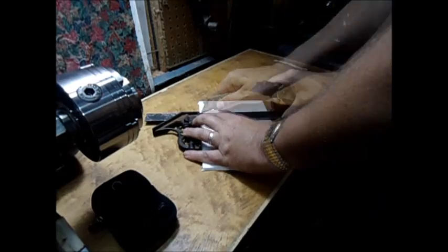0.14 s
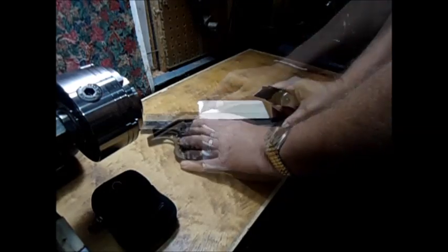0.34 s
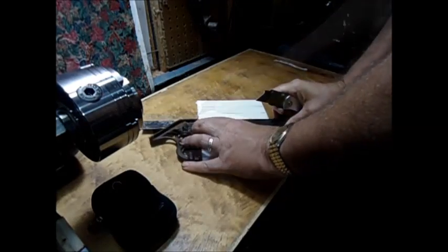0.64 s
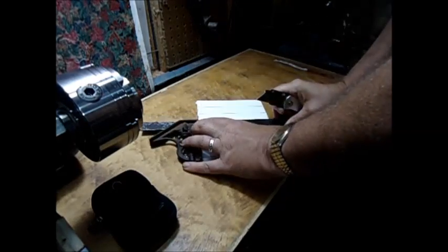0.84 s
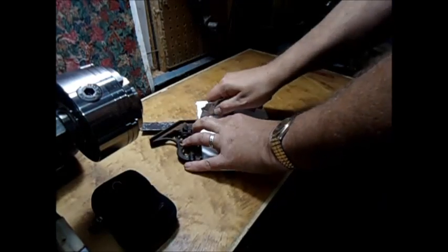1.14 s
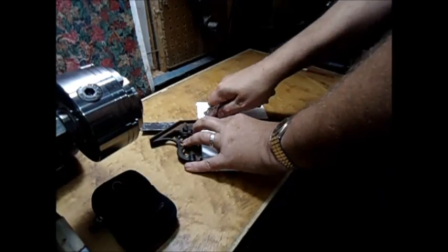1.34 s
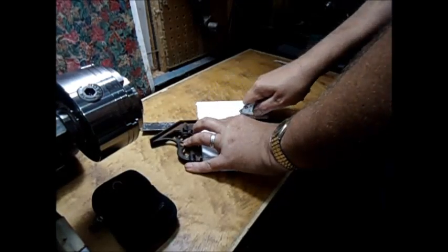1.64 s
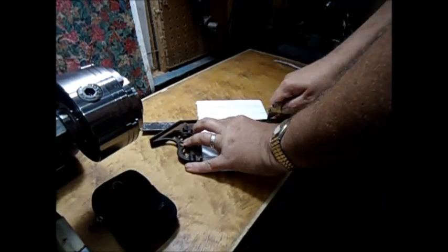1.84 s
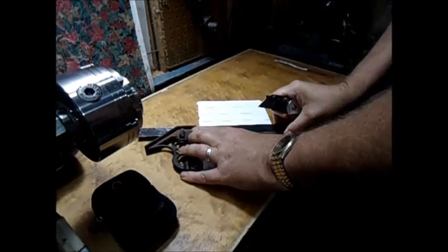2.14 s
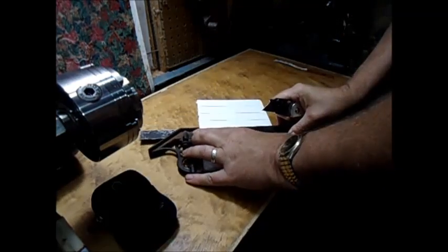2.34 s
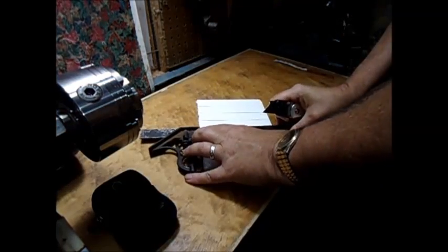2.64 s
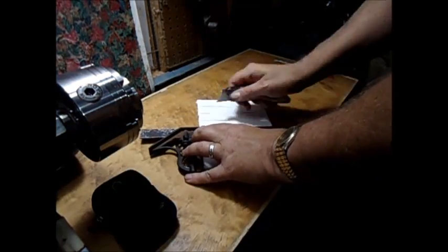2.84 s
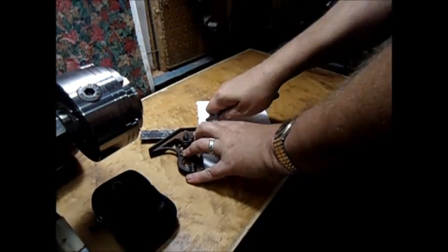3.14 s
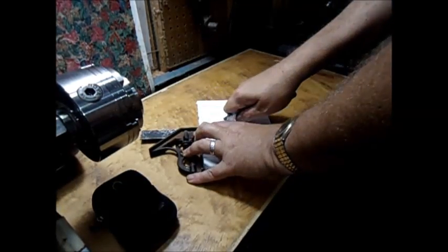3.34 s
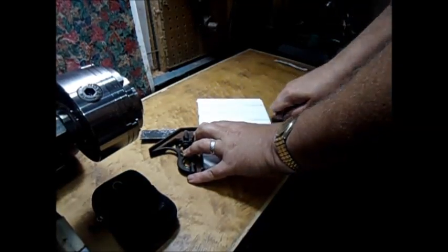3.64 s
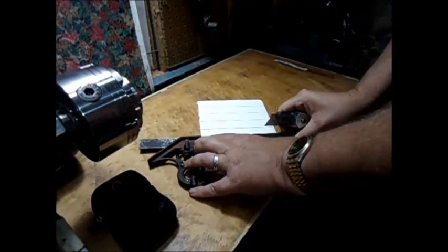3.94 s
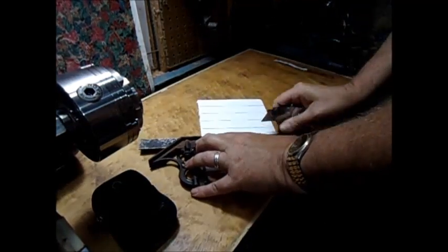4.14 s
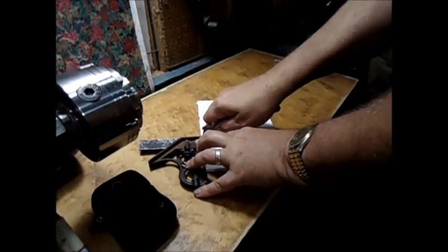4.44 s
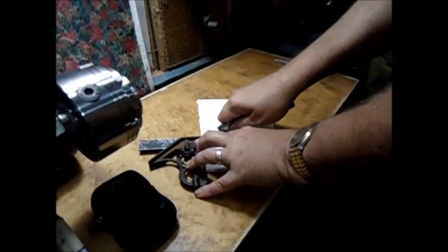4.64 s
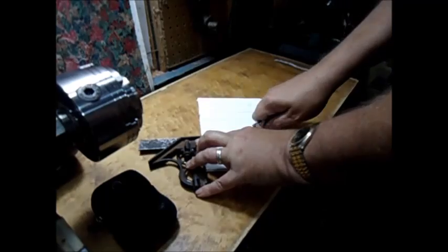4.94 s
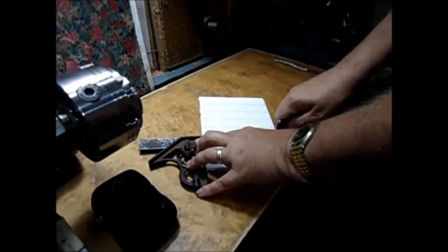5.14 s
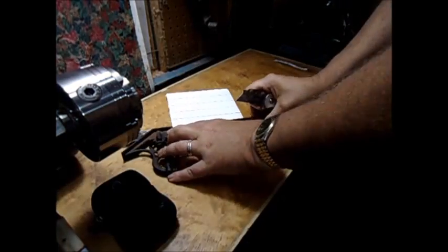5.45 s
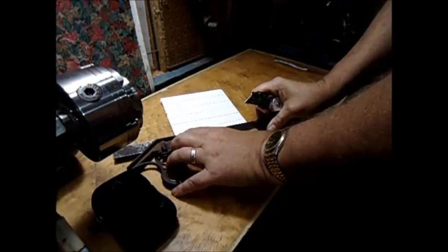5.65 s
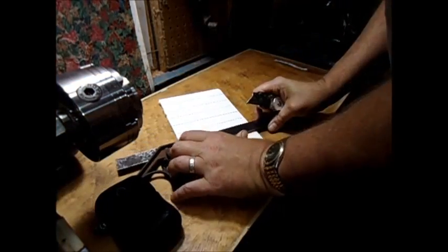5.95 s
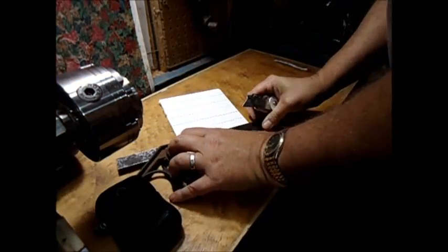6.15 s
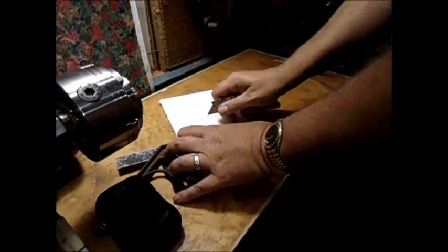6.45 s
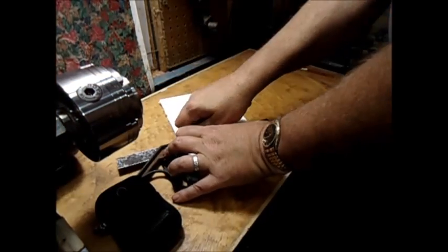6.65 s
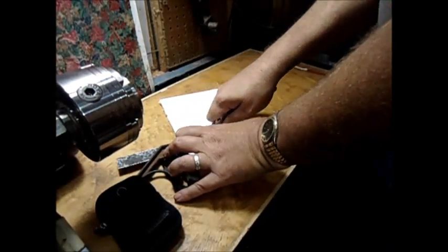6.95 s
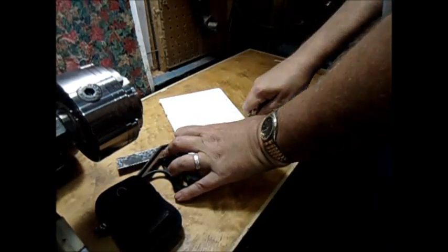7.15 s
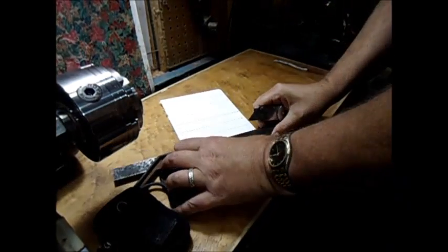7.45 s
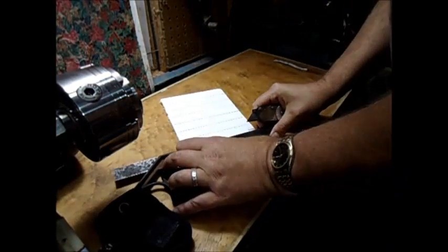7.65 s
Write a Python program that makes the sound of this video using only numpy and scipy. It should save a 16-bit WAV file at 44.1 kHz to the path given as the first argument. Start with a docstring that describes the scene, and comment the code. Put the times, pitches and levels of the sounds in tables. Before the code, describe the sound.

A small cutter scores foam board along a metal straightedge. Each half-second stroke is a thin, uneven, papery rasp with a faint metallic edge, growing towards its end; loud wooden-metallic snaps follow. Pauses hold soft rubbing, brief paper scuffs, small ticks and muffled bench knocks, the strongest shifting after the third cut. Dry close pickup in a small quiet room, mono, with low hum and a little hiss.

```python
"""Cutting foam board along a steel square

In four strokes a hand cutter tears the paper face of foam board: random grains in surges, and blade modes.
Its holder drags along the square, and board and square slide: grains filtered into dull and bright bands.
Snaps onto the wooden bench, one early and others as strokes end, and knocks are clicks or noise ringing
damped modes; ticks are dying noise. Below lies room hum with rumble; the level dips once for a moment."""
import sys
import numpy as np
from scipy import signal
from scipy.fft import rfft, irfft, next_fast_len
from scipy.io import wavfile

SR = 44100
rng = np.random.default_rng(int(sys.argv[2]) if len(sys.argv) > 2 else 0)


def generate_wav(sig):
    """Save sig (samples, or channels by samples) to the path in sys.argv[1] as 16-bit PCM at SR."""
    pcm = np.round(np.clip(np.atleast_2d(sig).T, -1, 1) * 32767).astype(np.int16)
    wavfile.write(sys.argv[1], SR, pcm)


N = 344200

# four pulls of the blade, each a curve: (t/s, tearing level/dB, holder drag level/dB)
STROKES = [
    [(1.48, -70, -79), (1.52, -54, -74), (1.55, -60, -76), (1.595, -49.5, -58), (1.64, -59, -71),
     (1.68, -56, -69), (1.74, -59, -65), (1.77, -68, -77), (1.797, -48, -54), (1.81, -58, -63),
     (1.822, -52, -60), (1.845, -61, -71), (1.873, -47, -54.5), (1.92, -63, -66), (1.942, -54, -63)],
    [(3.13, -67, -68), (3.2, -56, -57.5), (3.26, -57.5, -57.5), (3.3, -62, -69), (3.375, -51.5, -60.5),
     (3.45, -61, -59.5), (3.49, -55, -58), (3.51, -55, -64), (3.53, -48, -50), (3.55, -54, -65),
     (3.575, -43, -53.5), (3.588, -50, -58), (3.605, -46, -55), (3.645, -74, -81), (3.7, -46, -56),
     (3.722, -66, -71), (3.745, -50, -55), (3.759, -39, -45)],
    [(4.585, -68, -68), (4.62, -56.5, -58.5), (4.69, -65, -57.5), (4.74, -48.5, -55), (4.775, -66, -62),
     (4.84, -51.5, -62), (4.9, -58, -57.5), (4.97, -61, -65), (5.03, -52, -60), (5.075, -54, -58),
     (5.1, -67, -74), (5.2, -56, -56.5), (5.265, -55, -61.5)],
    [(6.8, -69, -68), (6.82, -55.5, -68), (6.92, -68, -71), (6.957, -48, -61), (6.98, -62, -65.5),
     (7.05, -53, -53), (7.11, -56, -59.5), (7.15, -54, -60), (7.17, -55, -60), (7.192, -51, -52),
     (7.215, -70, -76)],
]
# spectrum of a dull rub: (f/Hz, relative level per Hz/dB)
RUB_COLOUR = [(350, -47), (600, -8), (977, -0.5), (1160, -4.5), (3940, -6), (5470, -11.5), (9000, -21.5),
              (11700, -57), (19800, -120)]


def from_db(db):
    """Amplitude ratio: 20 dB is a factor of ten."""
    return 10 ** (np.asarray(db, float) / 20)


def rms_one(x):
    """Normalisation of mean power: scale to rms 1."""
    return x / np.sqrt(np.mean(x ** 2) + 1e-20)


def in_time(rows):
    """Linear interpolation: the columns of a curve, sample by sample."""
    s, *columns = np.transpose(rows)
    return [np.interp(np.arange(N) / SR, s, c) for c in columns]


def coloured(x, spectrum):
    """Linear filtering: weight the spectrum by levels in dB on a log-frequency axis; rms 1."""
    size = next_fast_len(N)
    hz = np.maximum(np.arange(size // 2 + 1) * SR / size, 1)
    table = np.array(spectrum)
    gain = from_db(np.interp(np.log(hz), np.log(table[:, 0]), table[:, 1]))
    return rms_one(irfft(rfft(x, size) * gain, size)[:N])


def drift(rate_hz):
    """Low-passed noise: a slow random course of rms 1, drawn at every 20th sample."""
    r = np.exp(-2 * np.pi * rate_hz * 20 / SR)
    noise = rng.standard_normal(N // 20 + 2002)
    slow = signal.lfilter([1], [1, -2 * r, r * r], noise)[2000:]     # leave out the filter's onset
    return np.interp(np.arange(N) / 20, np.arange(len(slow)), rms_one(slow))


def ring(drive, hz, t60):
    """Damped resonance: a unit click sets a sine of height 1 ringing, 60 dB down after t60 seconds."""
    r, w = from_db(-60 / (t60 * SR)), 2 * np.pi * hz / SR
    return signal.lfilter([0, np.sin(w)], [1, -2 * r * np.cos(w), r * r], drive + 1e-18)


def high_pass(x, hz):
    """Second-order high-pass: attenuation of 12 dB per octave well below the corner."""
    return signal.sosfilt(signal.butter(2, hz, "high", fs=SR, output="sos"), x)


def add(out, s, peak_db, sound):
    """Superposition: place a short sound at a time with a given peak."""
    at = round(s * SR)
    out[at:at + len(sound)] += (from_db(peak_db) * sound / np.max(np.abs(sound)))[:N - at]


def grains(per_s, spread_db, surge_db, surge_hz):
    """Stick and slip: contacts break one by one at random sizes and come in surges."""
    sizes = from_db(spread_db * np.minimum(rng.exponential(1, N), 4)) * rng.choice([-1, 1], N)
    breaks = rng.random(N) < per_s / SR
    return sizes * breaks * from_db(surge_db * drift(surge_hz))


def stroke_gain(rows, column):
    """Level envelope: gain of one stroke's curve, silent before and after."""
    t, table = np.arange(N) / SR, np.array(rows)
    return from_db(np.interp(t, table[:, 0], table[:, column], left=-200, right=-200))


def one_band(grit, hz):
    """Resonant friction: grit passes twice through one damped resonance."""
    t60 = 32 / hz     # the same number of cycles in any band
    return rms_one(ring(ring(grit, hz, t60), hz, t60))


def tearing():
    """Fracture noise: parting paper fibres give bright grit; the blade's modes ring, each swelling alone."""
    # blade modes ringing under the tearing: (f/Hz, mean level/dB, t60/s)
    blade_modes = [(8550, -16.5, 0.0023), (9700, -12.5, 0.0039), (11400, -18, 0.0061), (12100, -26, 0.0062),
                   (13000, -16, 0.0056), (14600, -11, .004)]
    # spectrum of parting fibres: (f/Hz, relative level per Hz/dB)
    tear_colour = [(1760, -45), (3000, -37), (4450, -9), (5260, -4), (6790, -14), (8300, -2), (12200, 4.5),
                   (15700, -4)]
    fibres = grains(per_s=9000, spread_db=2.5, surge_db=3.8, surge_hz=80)
    chatter = grains(per_s=5500, spread_db=3, surge_db=4.0, surge_hz=40)
    swell_db = 4.5
    blade = sum(from_db(db + swell_db * drift(16)) * rms_one(ring(chatter, hz, t60))
                for hz, db, t60 in blade_modes)
    effort = sum(stroke_gain(rows, column=1) for rows in STROKES)
    return effort * rms_one(coloured(fibres, tear_colour) + blade)


def dragging():
    """Sliding friction: the blade holder rubs along the square, dull grit with a few rasping bands."""
    # bands rung along the square, one list a stroke: (f/Hz, level re dull grit/dB)
    rasp_bands = [
        [(5270, -2.5), (2320, -6)],
        [(5260, -4), (2830, -11)],
        [(5050, -7), (1960, -6.5)],
        [(3480, -2), (2690, -3.5), (4600, -7)],
    ]
    grit = grains(per_s=6000, spread_db=2.8, surge_db=2.0, surge_hz=50)
    dull = coloured(grit, RUB_COLOUR)
    out = np.zeros(N)
    for rows, bands in zip(STROKES, rasp_bands):
        rasp = sum(from_db(db) * one_band(grit, hz) for hz, db in bands)
        out += stroke_gain(rows, column=2) * (dull + rasp)
    return out


def sliding():
    """Sliding friction: each slide swells and fades as even grit, dull, bright and in one band."""
    # board, square and blade slid between cuts: (start t/s, loudest t/s, end t/s,
    # dull rub level/dB, bright paper scuff level/dB, rung band f/Hz, rung band level/dB)
    slides = [(.08, 0.095, .11, -57, -60, 4800, -75), (0.09, .18, 0.25, -57.5, -71, 4800, -73),
              (0.244, .265, .3, -59.5, -57.5, 4800, -72), (0.266, 0.336, 0.58, -55.5, -82, 3210, -60.5),
              (0.347, 0.396, .47, -70, -69, 7800, -65), (0.497, 0.677, 1.07, -63.5, -86, 4800, -71),
              (1.276, 1.288, 1.32, -66, -56, 10000, -60), (1.378, 1.418, 1.435, -65, -56, 10100, -56),
              (1.966, 2.082, 2.4, -63, -70, 2700, -75), (2.235, 2.247, 2.27, -54, -57, 4500, -64),
              (2.27, 2.275, 2.31, -59.5, -56, 5000, -60), (2.427, 2.486, 2.53, -68, -69, 5600, -67),
              (3.072, 3.095, 3.12, -62, -52, 5000, -67), (3.935, 3.962, 4.04, -46, -59, 4160, -52),
              (3.988, 4.047, 4.1, -55.5, -67, 4430, -59), (4.186, 4.272, 4.36, -58, -80, 4830, -74),
              (5.353, 5.47, 5.55, -51, -45, 3480, -53.5), (5.537, 5.592, 5.6, -51, -62, 4440, -61),
              (5.65, 5.662, 5.74, -57, -57, 3660, -61), (5.698, 5.69, 5.78, -60.5, -62, 3660, -68),
              (5.943, 6.003, 6.13, -60, -63.5, 3100, -60.5), (7.264, 7.289, 7.29, -48.5, -52, 4000, -63),
              (7.433, 7.454, 7.5, -55, -65, 3840, -71), (7.48, 7.525, 7.59, -49, -57, 3900, -53)]
    # spectrum of a bright paper scuff: (f/Hz, relative level per Hz/dB)
    scuff_colour = [(1500, -27), (3000, -13), (5500, -3.5), (6600, -7.5), (9000, 0.5), (10000, 0),
                    (13000, 2.5), (15700, -1.5)]
    fade_db, roundness = -18.5, 1.59     # level at both ends re loudest; 1 peaked, 2 rounded
    out = np.zeros(N)
    grit = grains(per_s=6500, spread_db=2.8, surge_db=1.6, surge_hz=60)
    dull, bright = coloured(grit, RUB_COLOUR), coloured(grit, scuff_colour)
    for start, loudest, end, dull_db, bright_db, hz, band_db in slides:
        part = slice(round(start * SR), round(end * SR))
        # distance from the loudest moment: 0 there, 1 at either end
        away = np.abs(np.interp(np.arange(N)[part] / SR, [start, loudest, end], [-1, 0, 1]))
        rub = from_db(dull_db) * dull[part] + from_db(bright_db) * bright[part]
        rub += from_db(band_db) * one_band(grit[part], hz)
        out[part] += from_db(fade_db * away ** roundness) * rub
    return out


def snaps():
    """Impact: a click rings the cutter's modes; a crack leads, a loose rattle trails until the hand stops it."""
    # blade leaves the board and hits the bench: (t/s, body peak level/dB, crack re body peak/dB,
    # treble sizzle gain in the crack/dB, rattle re body peak/dB, rattle length/s,
    # extra level of modes under 1.5 kHz/dB, extra level of modes at 1.5-2.2 kHz/dB)
    hits = [(0.0689, -12.5, -2, -1, -18, 0.018, -3, -4), (1.9424, -14, 3.5, 5, -11, 0.025, -1, -6),
            (3.7597, -13, 5.5, -4, -11.5, 0.036, -0.5, 4.5), (5.2656, -26.5, 17, 14, -4, 0.023, 13, 12),
            (5.2678, -19.5, 2, -6, -10, 0.021, 7, 11), (7.2654, -26, 8.5, 9, -3, 0.011, -9, -2)]
    # modes of cutter body and bench: (f/Hz, mean level/dB, t60/s)
    cutter_modes = [(440, -13.5, 0.037), (1100, -6, 0.026), (1304, -2, 0.011), (1700, -9.5, 0.021),
                    (2030, -12, 0.038), (2280, -4.5, 0.008), (2795, -1.5, 0.005), (3770, -6, 0.0041),
                    (4115, -8, 0.022), (4510, -3, 0.015), (5954, -9.5, 0.019), (6990, -9, 0.014),
                    (8370, -10.5, 0.01), (9180, -6.5, 0.0078), (12800, -4, 0.0044)]
    out, t = np.zeros(N), np.arange(SR // 15) / SR
    for s, peak_db, crack_db, sizzle_db, rattle_db, rattle_s, low_db, mid_db in hits:
        noise = rng.standard_normal((3, len(t)))
        strength_db = rng.normal(0, 1, len(cutter_modes))
        contact = (t == 0) + 0.11 * noise[0] * np.exp(-t / 0.0024)     # the edge lands, then skids briefly
        body = np.zeros(len(t))
        for k, (hz, db, t60) in enumerate(cutter_modes):
            mode_db = db + strength_db[k] + low_db * (hz < 1500) + mid_db * (1500 < hz < 2200)
            body += (-1) ** k * from_db(mode_db) * ring(contact, hz, t60)
        sizzle = high_pass(noise[1], 11000) * (np.exp(-t / 0.0006) + 0.15 * np.exp(-t / 0.003))
        click = 3 * high_pass(np.exp(-t / 0.00006), 1500)
        crack = from_db(sizzle_db) * sizzle + click
        stop = 1 / (1 + np.exp((t - rattle_s) / 0.0024))
        loose = noise[2] * np.exp(-t / 0.018) * stop
        rattle = rms_one(ring(loose, 2600, 0.00032)) + from_db(3) * rms_one(loose)
        add(out, s, peak_db, high_pass(body, 610))
        add(out, s, peak_db + crack_db, crack)
        add(out, s, peak_db + rattle_db, high_pass(rattle, 590))
    return out


def ticks():
    """Small impacts: a sharp, dying spray of noise, its dull part from the board, its bright from the steel."""
    # ticks of blade and square: (t/s, peak level/dB, bright part re dull part/dB)
    small_hits = [(0.0112, -36.5, -7), (0.329, -35.5, -16), (0.7373, -27, 2.5), (1.1178, -37, 3),
                  (1.2609, -40, 1), (1.3502, -36.5, 0.5), (1.369, -40, -2), (1.418, -37, 6),
                  (1.516, -29.5, 8), (1.8208, -33, 10), (1.873, -37, 14), (2.006, -44, -4),
                  (2.0484, -39, -2), (2.112, -41, -6), (2.426, -36, -2.5), (3.491, -35, 2),
                  (3.5764, -33, 14), (3.825, -41, 3), (3.955, -36, -1), (4.149, -39, -7),
                  (4.1828, -40.5, -7), (4.3333, -41, 6), (4.8934, -35, 7), (5.014, -36.5, -4),
                  (5.035, -38, -4), (6.47, -41, -2.5), (6.8765, -41, 0), (6.9939, -35.5, 3),
                  (7.123, -35, 6), (7.3466, -44, 6), (7.4627, -35, 1.5)]
    out, t = np.zeros(N), np.arange(SR // 30) / SR
    for s, peak_db, bright_db in small_hits:
        spray = (rng.standard_normal(len(t)) + 2.3 * (t == 0)) * from_db(-60 * t / 0.022)
        dull = high_pass(ring(spray, 2220, 0.0011), 600)
        bright = high_pass(spray, 5800)
        add(out, s, peak_db, rms_one(dull) + from_db(bright_db) * rms_one(bright))
    return out


def knocks():
    """Modal excitation: a rough, short contact drives the bench; where it lands sets the leading low mode."""
    # knocks of square and board on the bench: (t/s, peak level/dB, leading mode f/Hz,
    # gain of clatter and of modes above 1.5 kHz/dB, contact decay time/s)
    blows = [(0.22, -31, 440, 22, 0.013), (0.235, -32, 570, -21, 0.017), (0.352, -35, 340, -14, 0.0026),
             (1.017, -33.5, 255, -15, 0.0106), (3.785, -34.5, 427, -8, 0.01),
             (3.887, -31.5, 1060, -9, 0.004), (3.913, -36.5, 623, -7, 0.005),
             (5.267, -29.5, 290, -1, 0.0064), (5.338, -25.5, 475, -6.5, 0.0085),
             (6.24, -46, 600, 4, 0.0037), (6.263, -36, 696, -21, 0.004)]
    # modes of the bench top: (f/Hz, level before the knock's gain/dB, t60/s)
    bench_modes = [(285, 4, 0.22), (526, 2, 0.028), (627, 2, 0.011), (1024, 2, 0.015), (1220, -6, 0.028),
                   (1900, -0.5, 0.065), (2360, 8, 0.014), (3160, 3, 0.011), (4370, 2, 0.019)]
    out, t = np.zeros(N), np.arange(SR // 8) / SR
    for s, peak_db, lead_hz, bright_db, contact_s in blows:
        contact = rng.standard_normal(len(t)) * np.exp(-t / contact_s)
        modes = sum(from_db(db + bright_db * (hz > 1500)) * rms_one(ring(contact, hz, t60))
                    for hz, db, t60 in bench_modes)
        clatter = from_db(bright_db + 6.5) * rms_one(ring(contact, 1800, 0.002))     # loose parts, no pitch
        lead = from_db(8.5) * rms_one(ring(contact, lead_hz, 0.034))
        add(out, s, peak_db, modes + clatter + lead)
    return out


def room():
    """Stationary noise: coloured room hum with microphone hiss, swaying slightly, and a low band of rumble."""
    # spectrum of hum and hiss: (f/Hz, relative level per Hz/dB)
    room_colour = [(8.8, -22), (15, -20), (43, -9), (129, -2), (328, -6), (358, -7.5), (414, -7.5),
                   (1050, -18.5), (1400, -20.5), (3360, -28.5), (4240, -31), (13200, -36), (15700, -35.5)]
    # course of the rumble: (t/s, level/dB)
    rumble_curve = [(0.0, -51), (0.78, -49.5), (0.89, -59.5), (6.8, -63), (7.36, -57), (7.8, -67)]
    level_db, sway_db = -50, 0.5 * drift(8)
    hum = coloured(rng.standard_normal(N), room_colour) * from_db(level_db + sway_db)
    band = signal.butter(2, [18, 80], "band", fs=SR, output="sos")
    rumble = rms_one(signal.sosfilt(band, rng.standard_normal(N)))
    return hum + from_db(in_time(rumble_curve)[0]) * rumble


def scene():
    """Superposition: all sources add at one microphone."""
    return (tearing() + dragging() + sliding() + snaps() + ticks() + knocks() + room())[None]


def record(dry):
    """Gain and low-pass filtering: the level dips briefly; a steep filter cuts the top."""
    start, end, dip_db = 3.411, 3.442, -32.5     # s, s, dB
    level_db, = in_time([(start - 0.003, 0), (start, dip_db), (end, dip_db), (end + 0.00054, 0)])
    steep = signal.ellip(14, 0.5, 70, 15800, fs=SR, output="sos")     # ripple dB, stopband dB, cutoff Hz
    return signal.sosfilt(steep, dry * from_db(level_db))


dry = scene()
out = record(dry)
generate_wav(out)
```